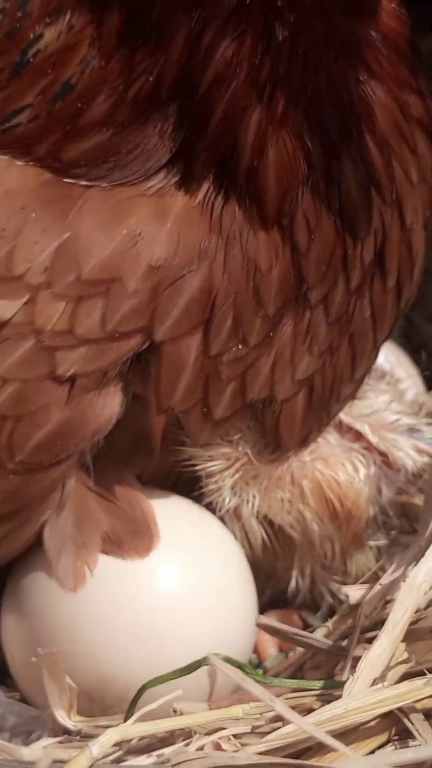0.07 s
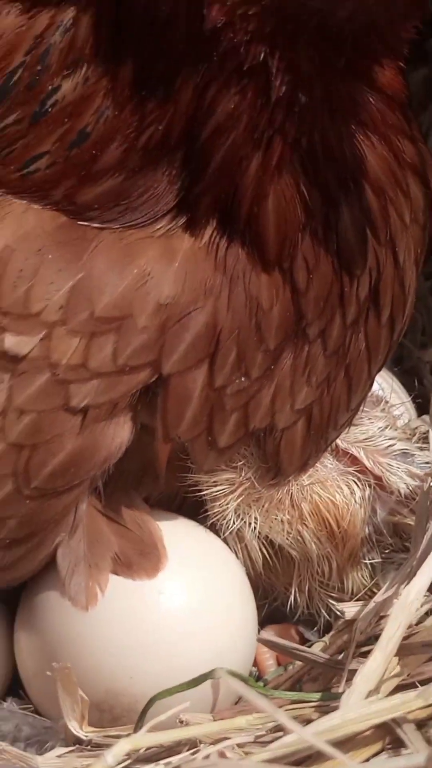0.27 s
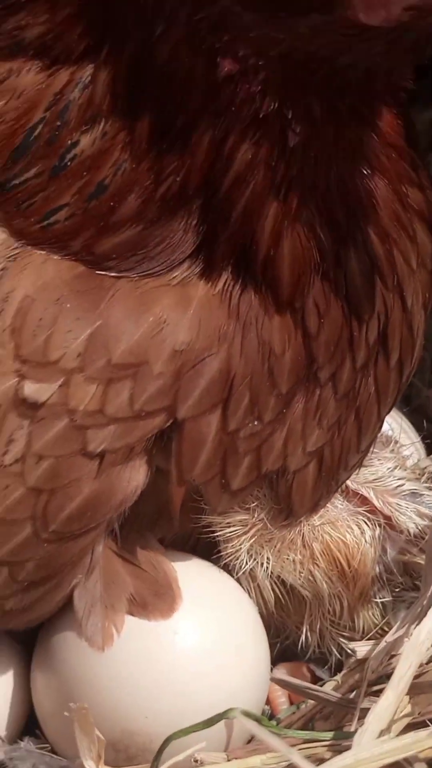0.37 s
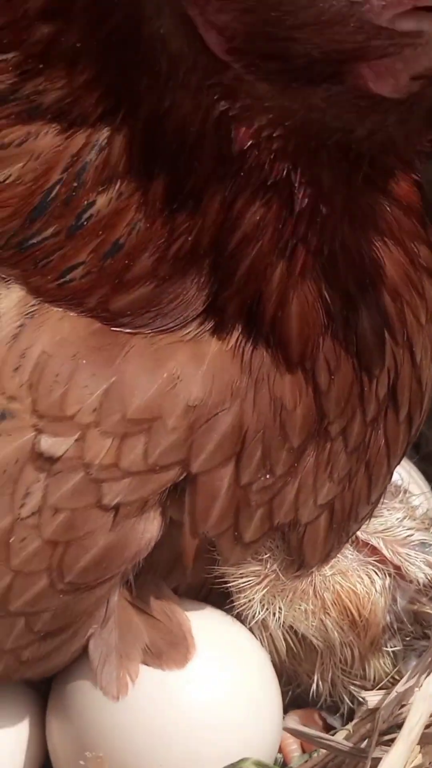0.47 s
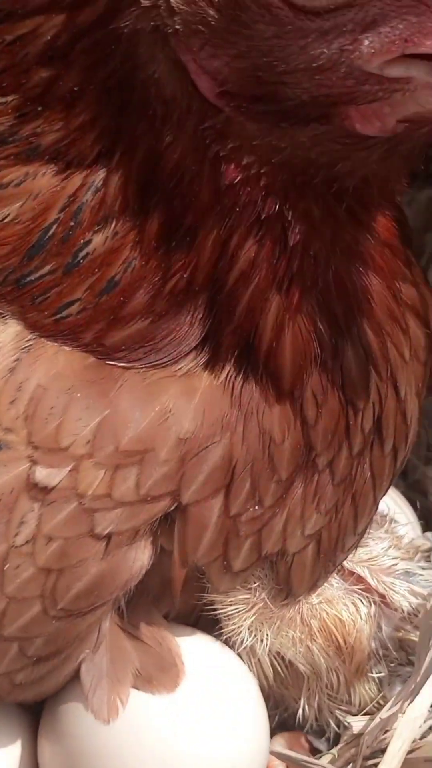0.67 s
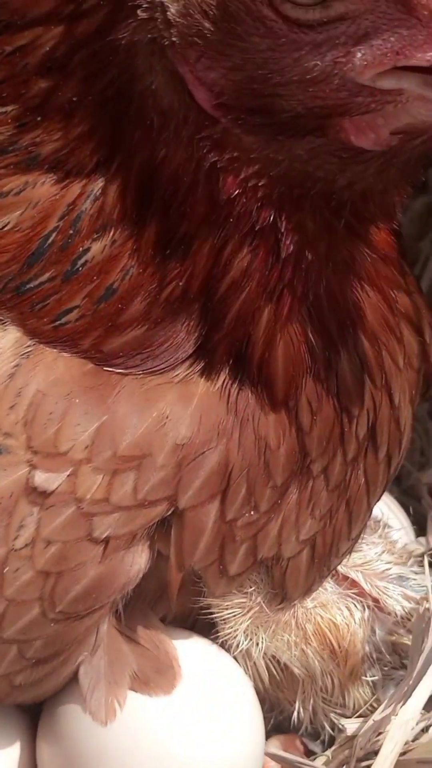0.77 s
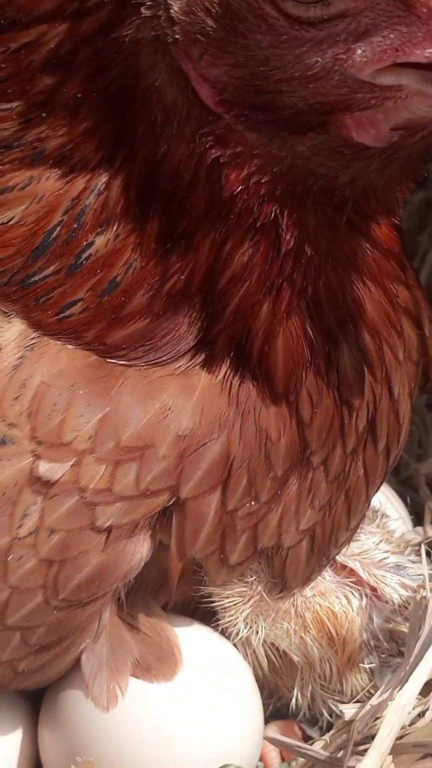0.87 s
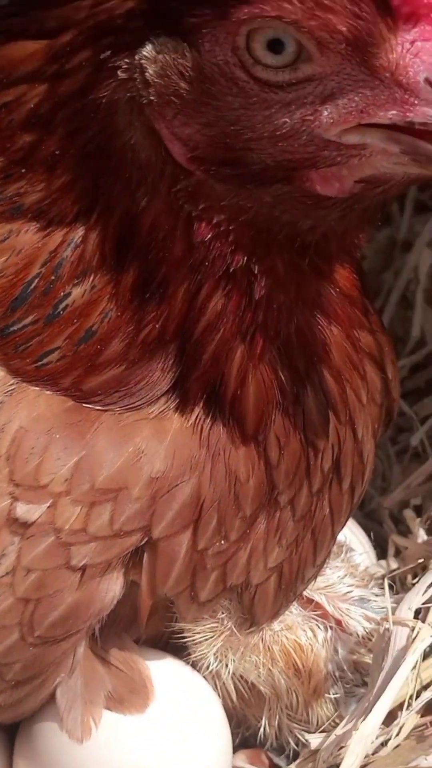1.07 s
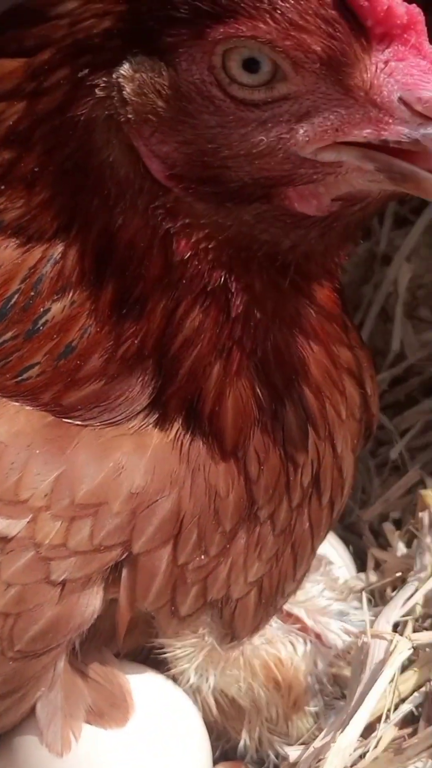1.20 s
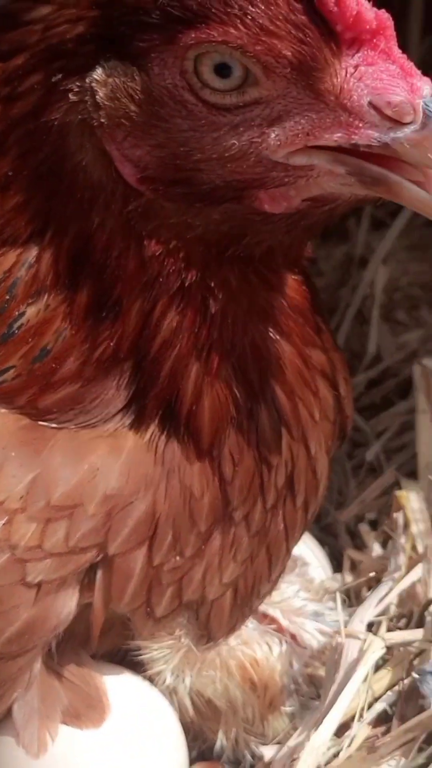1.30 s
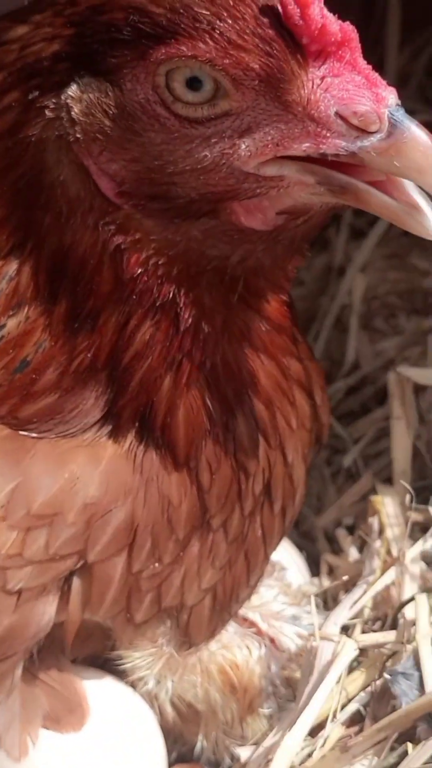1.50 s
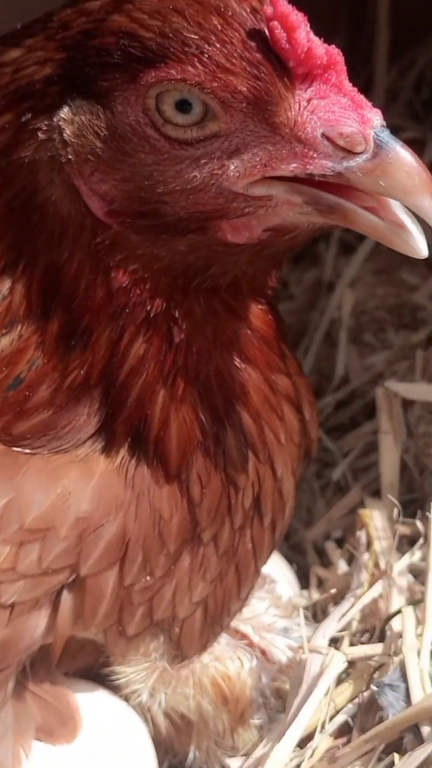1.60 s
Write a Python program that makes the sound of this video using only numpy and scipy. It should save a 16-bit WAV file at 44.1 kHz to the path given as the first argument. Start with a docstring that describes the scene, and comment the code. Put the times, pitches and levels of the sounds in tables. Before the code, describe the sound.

A hen gives one shrill, harsh squawk from about 0.2 to 0.6 seconds, a strained, whistling squeal that cracks upward near 0.5 and breaks into a rasp. It rings briefly in the coop. Two faint chick peeps come just before it, and fainter ones follow between 1.1 and 1.5 seconds. A low hum, a dull outdoor rush and very faint distant fowl lie underneath.

```python
"""Hen squawk in a coop.

A hen on a straw nest gives one shrill, harsh squawk: a squeal of strained harmonics that cracks upward
and breaks into a rasp, while the second side of her voice box whistles. Chicks peep faintly before and
after, far fowl call and the coop rings. A low hum, a dull outdoor rush and a faint din lie underneath."""
import sys
import numpy as np
from scipy import signal
from scipy.fft import rfft, irfft, next_fast_len
from scipy.io import wavfile
from scipy.ndimage import uniform_filter1d, map_coordinates

SR = 44100
rng = np.random.default_rng(int(sys.argv[2]) if len(sys.argv) > 2 else 0)


def log_audio(samples):
    """Write samples as a 16-bit WAV file to the path given in sys.argv[1]."""
    # one column per channel
    frames = np.atleast_2d(samples).T
    # limit to full scale, then quantise
    limited = np.clip(frames, -1, 1)
    pcm = np.round(limited * 32767).astype(np.int16)
    wavfile.write(sys.argv[1], SR, pcm)


N = 72765

# Hum. Each row: time in seconds, lower line in dB, upper line in dB.
HUM_LEVELS = [(0, -66, -102.5), (.36, -56.5, -71.5), (.7, -60, -77.5), (.86, -84, -75.5), (.97, -62.5, -90),
              (1.05, -87, -88), (1.11, -59, -67), (1.33, -87, -80.5), (1.385, -60.5, -78),
              (1.44, -66, -59.5), (1.52, -78.5, -80), (1.65, -68.5, -59.5)]
# Outdoor rumble and hiss. Each row: frequency in Hz, relative density in dB.
RUMBLE_SPECTRUM = [(20, -33.5), (68, -6), (130, 1.5), (400, -25.5), (900, -63.5)]
HISS_SPECTRUM = [(400, -1.5), (1500, -4.5), (2300, -10.5), (3500, -9), (7500, -21.5)]
# Distant din. Each row: time in seconds, then low, middle and upper band in dB before trim.
DIN_LEVELS = [(0.0, -92, -68, -74), (0.164, -77.5, -65, -75.5), (0.233, -75.5, -62, -62.5),
              (0.325, -76.5, -58, -81), (0.399, -73, -72, -83), (0.464, -76.5, -66, -70),
              (0.624, -79, -70.5, -83), (0.871, -67.5, -64.5, -72.5), (1.02, -77, -74, -77.5),
              (1.33, -66.5, -69, -72.5), (1.481, -74.5, -70, -76.5), (1.65, -79.5, -70, -77)]
# Din bands. Each row: centre in Hz, half width in Hz, trim in dB.
DIN_PASSBANDS = [(640, 250, -4), (1024, 207, 0), (1520, 330, 1.5)]
# Far fowl. Each row: start in seconds, length in seconds, pitch in Hz, level in dB.
FOWL_NOTES = [(0, .09, 2420, -72), (.11, .07, 2440, -69), (.06, .12, 1820, -68), (.81, .09, 1160, -61),
              (1.2, .06, 1060, -64), (1.2, .12, 590, -65), (1.25, .15, 885, -62), (1.46, .09, 995, -62)]
# Chicks, then a faint far call near 4.2 kHz. Each row: start in seconds, length in seconds, first and last
# pitch in Hz, level in dB.
HIGH_NOTES = [(0.031, 0.047, 6930, 5330, -56), (0.143, 0.043, 6970, 5310, -51),
              (1.074, 0.08, 4192, 4170, -74), (1.171, 0.1027, 3990, 4430, -74),
              (1.382, .07, 6700, 5580, -78)]
# Coop decay. Each row: frequency in Hz, time to fall 60 dB in seconds.
COOP_T60 = [(500, 0.18), (2200, 0.83), (4000, 0.73), (5500, 0.68), (7000, .58)]
# Coop resonances. Each row: centre in Hz, width in Hz, lift in dB.
COOP_RINGS = [(3452, 90, 6), (4195, 60, 9), (5003, 55, 8), (5440, 110, 4)]
# Squeal pitch. Each row: time in seconds, fundamental in Hz.
SQUEAL_PITCH = [(.219, 880), (.226, 985), (.234, 1075), (.26, 1050), (.285, 1022), (.34, 1008), (.40, 1000),
                (.458, 1015), (.47, 1215), (.487, 1150), (.53, 1146)]
# Squeal harmonics. Each row: time in seconds, then fourth, second, third and sixth in dB.
SQUEAL_LEVELS = [(.217, -70, -71.5, -65.5, -74.5), (.234, -40.5, -47, -48, -42.5),
                 (.25, -40, -44.5, -45.5, -45), (.286, -56, -62, -38, -22),
                 (.338, -50.5, -71.5, -39.5, -26.5), (.352, -49, -79, -33, -35.5),
                 (.39, -53.5, -79, -52, -39), (.44, -60.5, -76, -49, -56.5), (.464, -56, -45.5, -53.5, -69),
                 (.483, -51, -57.5, -35, -61), (.51, -39.5, -62.5, -32, -48), (.53, -47.5, -67.5, -54, -47),
                 (.58, -74.5, -91, -58.5, -82.5)]
# Rasp as the call opens and as it breaks. Each row: time in seconds, level in dB.
OPENING_LEVELS = [(.222, -69.5), (.236, -38.5), (.254, -29.5), (.29, -32), (.33, -34.5), (.375, -37),
                  (.41, -38), (.44, -56.5), (.46, -45.5), (.50, -46.5), (.53, -63)]
BREAK_LEVELS = [(.465, -44.5), (.495, -33), (.522, -31.5), (.547, -31), (.57, -34.5), (.60, -36),
                (.64, -87.5)]
# Throat response for each rasp. Each row: frequency in Hz, relative gain in dB.
OPENING_SPECTRUM = [(300, -51), (1750, -24), (2100, -17), (2600, -10), (3300, -5), (4300, -0.5), (5100, -2),
                    (5900, 9.5), (6600, -6), (7100, -17.5), (7500, -30.5)]
BREAK_SPECTRUM = [(1000, -57.5), (1900, -34), (2250, -33), (2470, -6.5), (3150, -7), (3900, 2), (5000, -1),
                  (5900, -3), (6500, -5.5), (7000, -16), (7600, -26.5)]
# Rasp's lower band, weakest at the tightest squeal. Each row: time in seconds, gain in dB.
RASP_LOW_GAIN = [(.26, 2.5), (.31, -2.5), (.42, -16.5), (.455, 5), (.50, -7.5), (.525, 1.5)]
# Whistle. Each row: time in seconds, pitch in Hz, level in dB, side tone in dB, pitch scatter as a ratio.
WHISTLE_PATH = [(.32, 4325, -50, -52, .012), (.338, 4178, -33, -42, .013), (.378, 4016, -30.5, -32.5, .016),
                (.405, 3968, -26, -50, .009), (.414, 3975, -23.5, -54, .005), (.424, 4100, -48, -54, .012),
                (.475, 4110, -48, -64, .025), (.515, 4080, -29.5, -54, .026), (.56, 4190, -44, -68, .02)]

JITTER_HZ, SHIMMER_HZ = 700, 240  # wobble rates of the hen's pitch and level


def amp(db):
    """Decibels to gain."""
    return 10 ** (np.asarray(db) / 20)


def unit(x):
    """Scale to rms 1."""
    return x / np.sqrt(np.mean(x ** 2) + 1e-20)


def along(points, hz):
    """Interpolate (Hz, value) points on a log axis."""
    knots_hz, values = np.transpose(points)
    return np.interp(np.log(hz + 1), np.log(knots_hz + 1), values)


def curves(rows):
    """One value per sample for each column after the time."""
    times_s, *columns = np.transpose(rows)
    return [np.interp(np.arange(N) / SR, times_s, column) for column in columns]


def during(rows):
    """1 while a curve lasts, else 0."""
    t = np.arange(N) / SR
    return (t > rows[0][0]) & (t < rows[-1][0])


def wobble(rate_hz):
    """Smooth random curve, rate_hz knots a second."""
    return map_coordinates(rng.standard_normal(N // 8), [np.arange(N) * rate_hz / SR], mode="wrap")


def filtered(x, response):
    """Apply a gain function of frequency."""
    size = next_fast_len(N + SR // 2)
    return irfft(rfft(x, size) * response(np.fft.rfftfreq(size, 1 / SR)), size)[..., :N]


def noise(colour_db):
    """Noise of rms 1, coloured by a function of frequency."""
    return unit(filtered(rng.standard_normal(N), lambda hz: amp(colour_db(hz))))


def tone(hz):
    """Sine of rms 1 along a pitch curve."""
    return np.sqrt(2) * np.sin(2 * np.pi * np.cumsum(hz) / SR)


def hum(lower_hz=135.8, upper_hz=206.4):
    """Two wavering lines, as of a far engine."""
    lower_db, upper_db = curves(HUM_LEVELS)
    lower = amp(lower_db) * tone(lower_hz * (1 + 0.0027 * wobble(18)))
    upper = amp(upper_db) * tone(upper_hz * (1 + 0.03 * wobble(19)))
    return lower + upper


def outdoor_rush(rumble_db=-64, hiss_db=-75.5):
    """Unsteady rumble under steady hiss."""
    rumble = unit(amp(3 * wobble(11)) * noise(lambda hz: along(RUMBLE_SPECTRUM, hz)))
    hiss = noise(lambda hz: along(HISS_SPECTRUM, hz))
    return amp(rumble_db) * rumble + amp(hiss_db) * hiss


def patchy(x, depth_db=4):
    """Narrow, brief patches swell and fade in a noise."""
    spectra = signal.stft(x, nperseg=2048)[2]
    patches = uniform_filter1d(rng.standard_normal(spectra.shape), size=3, axis=0)
    patches = unit(uniform_filter1d(patches, size=4, axis=1))
    return unit(signal.istft(spectra * amp(depth_db * patches), nperseg=2048)[1][:N])


def din():
    """Blurred outdoor din, shifting between three noise bands."""
    total = np.zeros(N)
    for db, (centre_hz, half_width_hz, trim_db) in zip(curves(DIN_LEVELS), DIN_PASSBANDS):
        band = noise(lambda hz: -10 * np.log10(1 + ((hz - centre_hz) / half_width_hz) ** 6))
        total += amp(db + trim_db) * patchy(band)
    return total


def note(start_s, length_s, from_hz, to_hz, db, jitter):
    """One jittery glide that swells and fades."""
    progress = np.clip((np.arange(N) / SR - start_s) / length_s, 0, 1)
    hz = (from_hz + (to_hz - from_hz) * progress) * (1 + jitter * wobble(1000))
    return amp(db) * np.sin(np.pi * progress) * tone(hz)


def far_fowl():
    """Short, level-pitched notes of distant fowl."""
    return sum(note(start_s, length_s, hz, hz, db, jitter=0.0086)
               for start_s, length_s, hz, db in FOWL_NOTES)


def high_notes():
    """Thin peeps and a faint far call, hoarse with fast pitch jitter."""
    return sum(note(*row, jitter=0.034) for row in HIGH_NOTES)


def coop(x, direct_db, tail_db=-6.5, walls_db=-8.5, walls_decay_s=0.034):
    """Direct sound, near wall echoes and a tail that dies by band and rings at a few tones."""
    bins_hz, t, spectra = signal.stft(rng.standard_normal(SR), SR, nperseg=256)
    decay = amp(-60 * t / along(COOP_T60, bins_hz)[:, None])
    tail = unit(signal.istft(spectra * decay, SR, nperseg=256)[1])
    tail = filtered(tail, lambda hz: amp(sum(db / (1 + (2 * (hz - centre_hz) / width_hz) ** 2)
                                             for centre_hz, width_hz, db in COOP_RINGS)))
    walls = rng.standard_normal(N) * np.exp(-np.arange(N) / SR / walls_decay_s)
    echoes = amp(tail_db) * tail / np.linalg.norm(tail) + amp(walls_db) * walls / np.linalg.norm(walls)
    return amp(direct_db) * x + signal.fftconvolve(x, echoes)[:N]


def hoarse_harmonic(pitch_hz, order, fray_hz=800, shimmer_db=2.3):
    """Shimmering harmonic of rms 1; higher orders fray more."""
    fray = 1 + 0.03 * order * (wobble(fray_hz) + 1j * wobble(fray_hz))
    carrier = np.exp(2j * np.pi * np.cumsum(order * pitch_hz) / SR)
    return unit(amp(shimmer_db * wobble(SHIMMER_HZ)) * np.real(fray * carrier))


def squeal(jitter=0.0085, tremor=0.006, tremor_hz=70):
    """A strained voice yelps upward on harmonics 2 to 6; the third and sixth pierce."""
    pitch_hz, = curves(SQUEAL_PITCH)
    pitch_hz *= 1 + jitter * wobble(JITTER_HZ) + tremor * wobble(tremor_hz)
    fourth_db, second_db, third_db, sixth_db = curves(SQUEAL_LEVELS)
    levels_db = {2: second_db, 3: third_db, 4: fourth_db, 5: fourth_db - 4, 6: sixth_db}
    voice = sum(amp(db) * hoarse_harmonic(pitch_hz, order) for order, db in levels_db.items())
    return during(SQUEAL_LEVELS) * voice


def rasp(levels, throat, flutter_db=2, flutter_hz=320, split_hz=4700):
    """Chaotic flutter through the throat; the lower band swells and fades on its own."""
    level_db, = curves(levels)
    low_db, = curves(RASP_LOW_GAIN)
    flutter = amp(flutter_db * wobble(flutter_hz)) * rng.standard_normal(N)
    voice = unit(filtered(flutter, lambda hz: amp(along(throat, hz))))
    low = filtered(voice, lambda hz: 1 / (1 + (hz / split_hz) ** 20))
    return during(levels) * amp(level_db) * (voice - low + amp(low_db) * low)


def whistle(shimmer_db=2, side_ratio=1.165):
    """The voice box's second side whistles: it slides down, locks briefly on a clean note, then frays."""
    hz, main_db, side_db, scatter = curves(WHISTLE_PATH)
    shimmer = amp(shimmer_db * wobble(SHIMMER_HZ))
    main = unit(shimmer * tone(hz * (1 + scatter * wobble(JITTER_HZ))))
    side = tone(hz * side_ratio * (1 + scatter * wobble(JITTER_HZ)))
    return during(WHISTLE_PATH) * (amp(main_db) * main + amp(side_db) * side)


def scene():
    """Hen and small birds through the coop, over the outdoor background; mono."""
    hen = squeal() + whistle()
    hen += rasp(OPENING_LEVELS, OPENING_SPECTRUM) + rasp(BREAK_LEVELS, BREAK_SPECTRUM)
    birds = coop(hen, direct_db=-1)
    birds += coop(high_notes() + far_fowl(), direct_db=-19)  # hidden, so mostly echo
    return (birds + hum() + outdoor_rush() + din())[None]


def record(dry, top_hz=7500, taper_hz=150):
    """Low-pass: nothing above top_hz."""
    return filtered(dry, lambda hz: np.clip((top_hz - hz) / taper_hz, 0, 1))


dry = scene()
out = record(dry)
log_audio(out)
```